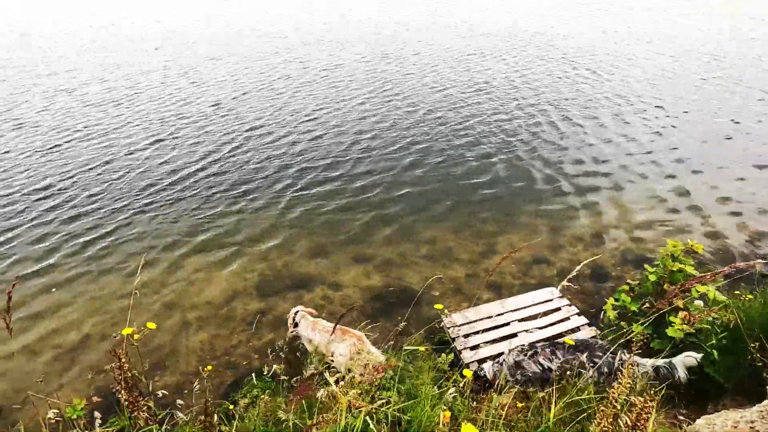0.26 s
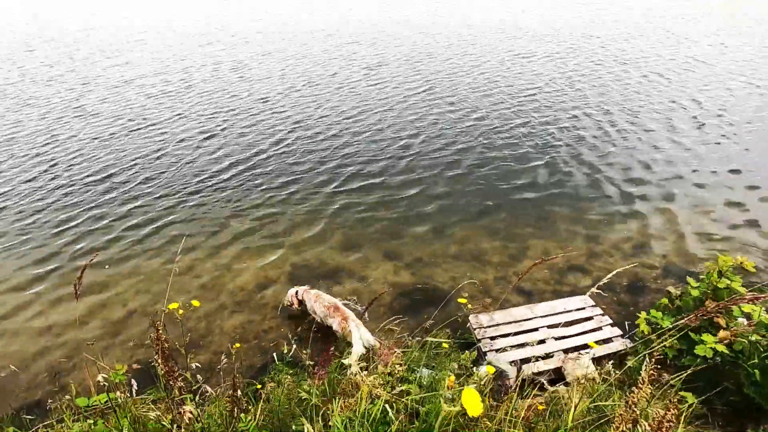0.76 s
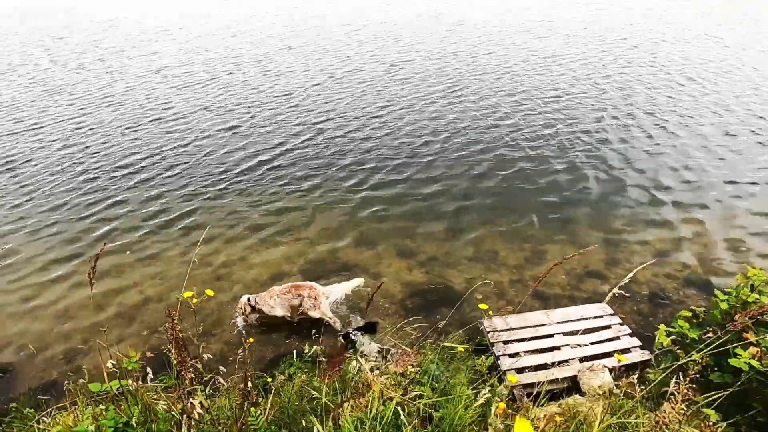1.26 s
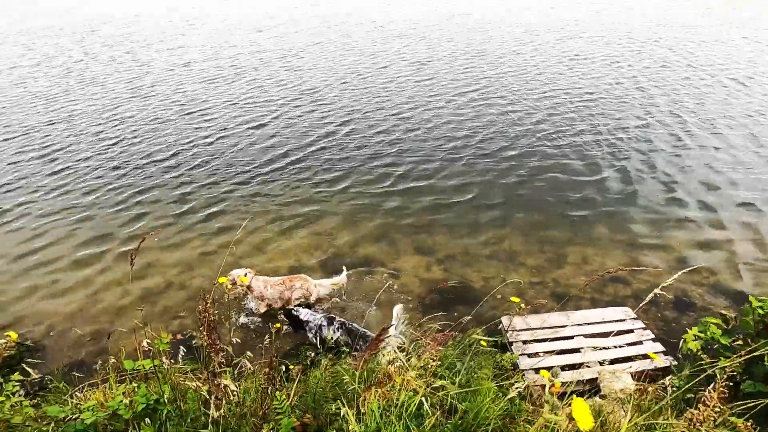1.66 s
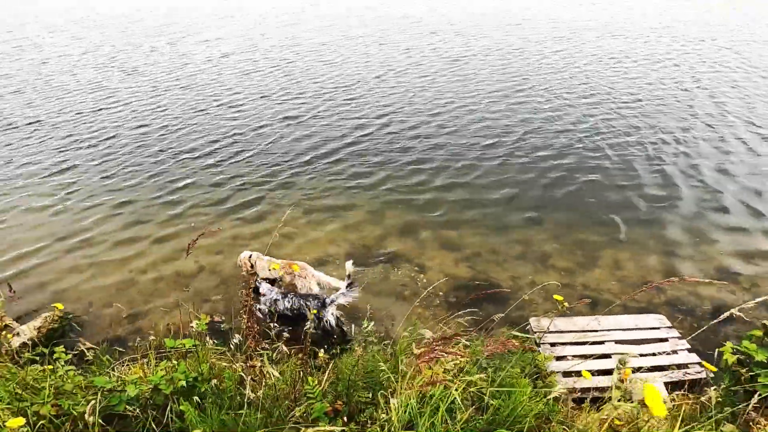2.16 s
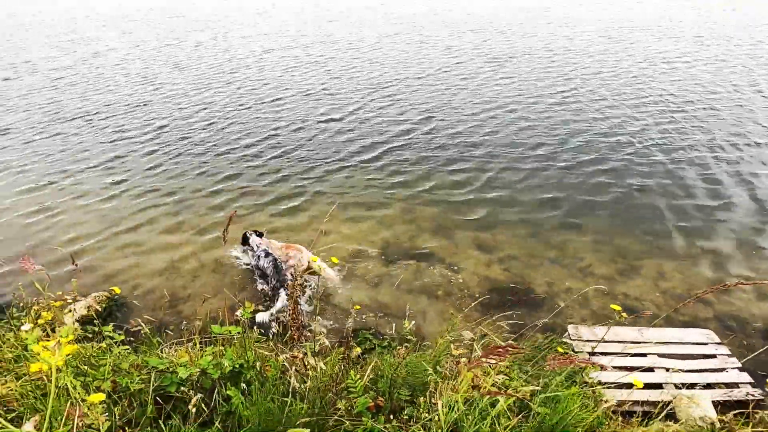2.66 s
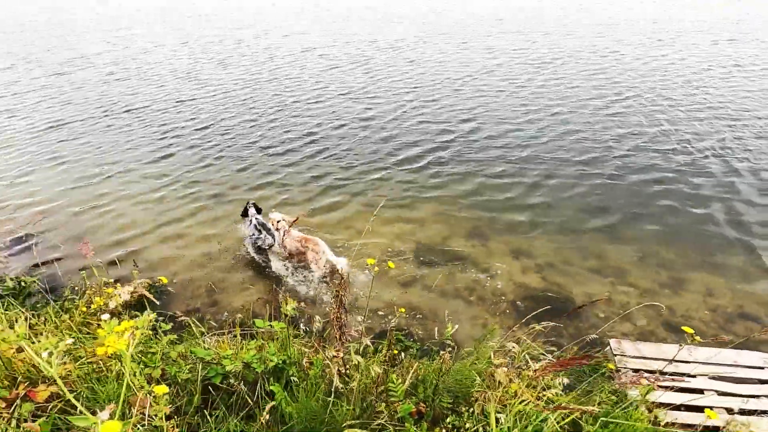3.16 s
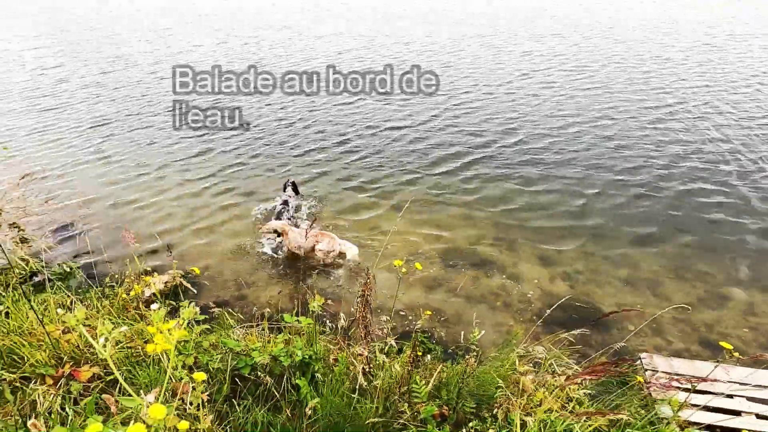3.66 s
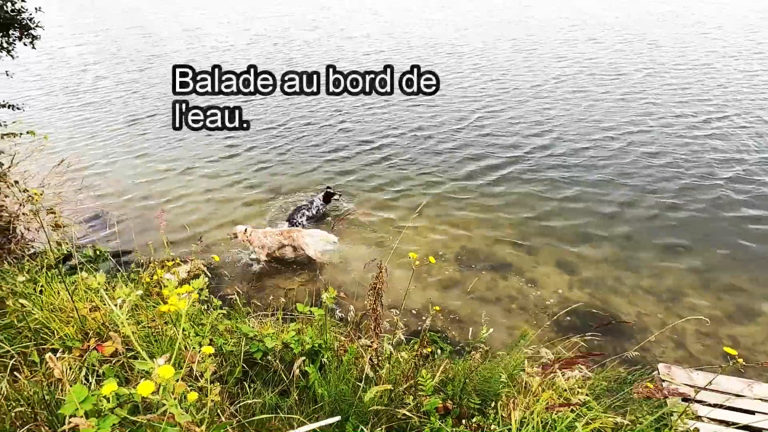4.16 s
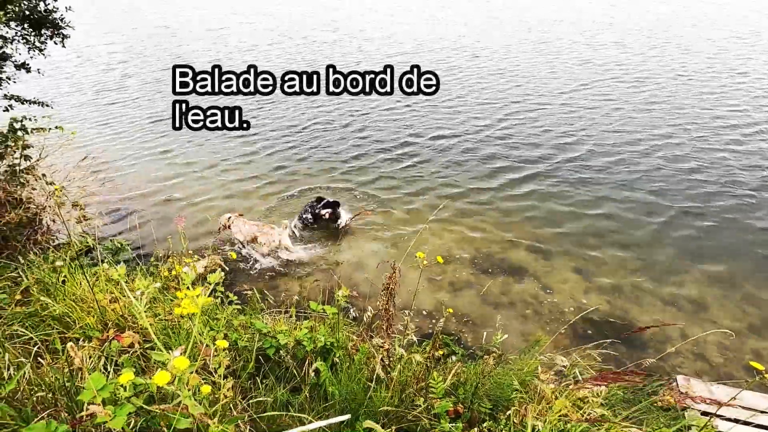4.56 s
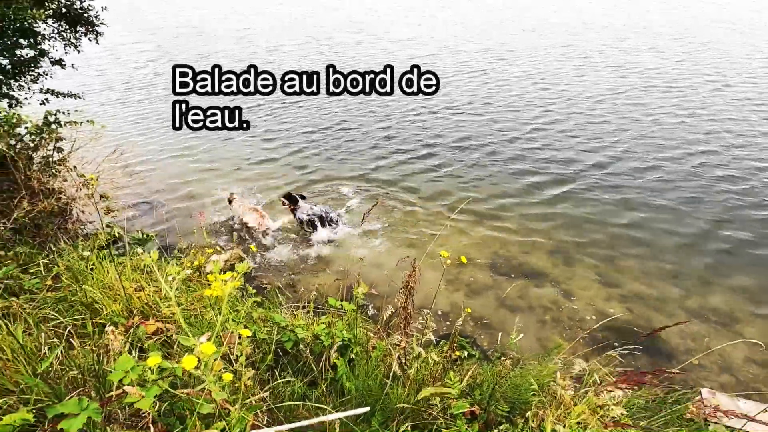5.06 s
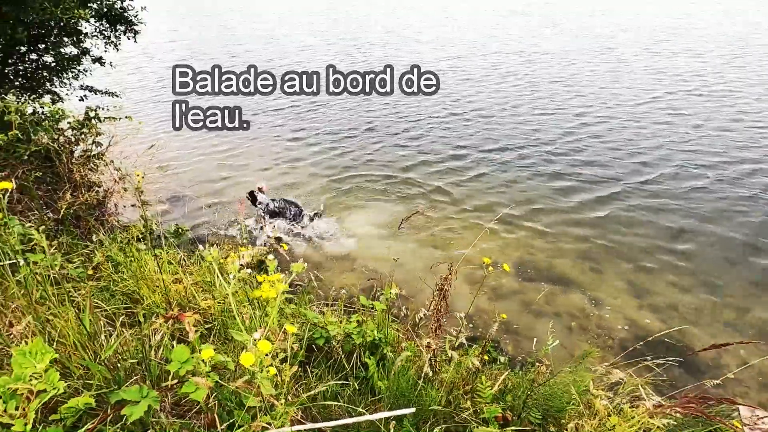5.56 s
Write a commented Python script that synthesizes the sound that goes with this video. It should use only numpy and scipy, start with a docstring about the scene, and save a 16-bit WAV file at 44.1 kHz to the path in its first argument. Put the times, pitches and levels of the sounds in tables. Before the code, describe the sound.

Two dogs wade through shallow lake water a few metres away. Their legs churn and slosh, paws slap the surface unevenly, and round plops and small drips fall in between. The splashing starts light and grows busier after about two seconds. Gusty wind rumbles on the microphone throughout, with an occasional dull thump. The water sounds boxy, as if heard through a closed case.

```python
"""Lake shallows, a few metres from a small camera in a closed case: two dogs wade and splash.
Legs churn up drops and bubbles, paws slap the surface, air pockets plop and single drops tick back.
The water reaches the two microphones through the ringing case; wind rumbles on it in gusts, with a
dull thump now and then. The sound starts in dull mono and opens into stereo after a second."""
import sys
import numpy as np
from scipy import signal
from scipy.fft import rfft, irfft, next_fast_len
from scipy.io import wavfile
from scipy.ndimage import uniform_filter1d

SR = 44100
rng = np.random.default_rng(int(sys.argv[2]) if len(sys.argv) > 2 else 0)


def master_out(mix):
    """Clip the mix to full scale and print it as 16-bit PCM to the path in sys.argv[1]."""
    frames = np.transpose(np.atleast_2d(mix))
    ceiling = np.clip(frames, -1, 1)
    pcm = np.round(ceiling * 32767).astype(np.int16)
    wavfile.write(sys.argv[1], SR, pcm)


N = 256573


def amp(db):
    """Gain of a level in dB."""
    return 10 ** (np.asarray(db) / 20)


def unit_rms(x):
    """Scaled to unit rms."""
    return x / np.sqrt(np.mean(x ** 2) + 1e-20)


def automation(rows):
    """Each level column of a timed table as a fader ride, one value per sample."""
    times, *columns = np.transpose(rows)
    return [np.interp(np.arange(N) / SR, times, column) for column in columns]


def drift(rate_hz):
    """Slow random wobble with a spread of 1."""
    pole = np.exp(-80 * np.pi * rate_hz / SR)   # runs at one step per 40 samples
    slow = signal.lfilter([1], [1, -2 * pole, pole * pole], rng.standard_normal(N // 40 + 2002))[2000:]
    return np.interp(np.arange(N) / 40, np.arange(len(slow)), unit_rms(slow))


def bursts(times, levels_db, t60s, rise):
    """Envelope of sudden hits that die away; the attack is the share `rise` of each decay time."""
    out, t = np.zeros(N), np.arange(SR // 2) / SR
    for s, level_db, t60 in zip(times, levels_db, t60s):
        start = round(s * SR)
        hit = amp(level_db - 60 * t / t60) * (1 - np.exp(-t / (rise * t60)))
        out[start:start + len(t)] += hit[:N - start]
    return out


def chirps(rows, rise_s, glide):
    """Dying tones whose pitch bends up by the share 2 * glide over their decay time."""
    out, t = np.zeros(N), np.arange(SR // 3) / SR
    for s, level_db, hz, t60 in rows:
        start = round(s * SR)
        turns = hz * t * (1 + glide * t / t60)
        tone = amp(level_db - 60 * t / t60) * (1 - np.exp(-t / rise_s)) * np.sin(2 * np.pi * turns)
        out[start:start + len(t)] += tone[:N - start]
    return out


def droplets(per_s, spread_db, clump_db, wash):
    """Drops of uneven size land in clumps over a smooth wash; two unrelated rows."""
    sizes = amp(spread_db * np.minimum(rng.exponential(1, N), 5)) * (rng.random(N) < per_s / SR)
    patter = unit_rms(sizes) + wash * np.abs(rng.standard_normal(N))
    clumps = amp(clump_db * (drift(17) + drift(18)))
    return unit_rms(patter * clumps * rng.choice([-1, 1], (2, N)))


def bubbles(per_s, spread_db, cycles, pitches=28):
    """Small bubbles, each ringing some cycles at a pitch of its own; two unrelated rows."""
    sizes = amp(spread_db * np.minimum(rng.exponential(1, (2, N)), 5))
    sizes *= rng.random((2, N)) < per_s / SR
    pitch_index, out = rng.integers(0, pitches, (2, N)), 0
    for k, hz in enumerate(np.geomspace(900, 9000, pitches)):
        decay, step = amp(-60 * hz / (cycles * SR)), 2 * np.pi * hz / SR
        kicks = sizes * (pitch_index == k) + 1e-18
        out += hz * signal.lfilter([0, np.sin(step)], [1, -2 * decay * np.cos(step), decay ** 2], kicks)
    return unit_rms(out)


# The wading bed: (time [s], spray level [dB], slosh level [dB])
WADING = [(0.0, -72, -60), (0.06, -68.5, -65.5), (0.27, -61, -60.5), (0.48, -69, -62.5), (0.84, -66, -62.5),
          (0.95, -68.5, -62), (1.25, -65.5, -61.5), (1.49, -57, -55.5), (1.72, -59, -55), (2.0, -59, -61),
          (2.25, -62, -60), (2.33, -63, -58.5), (2.49, -66, -60.5), (2.53, -58, -53), (2.72, -54.5, -54.5),
          (2.95, -57, -54), (3.45, -59, -55), (3.6, -65, -57), (3.75, -57.5, -55.5), (3.99, -65, -57),
          (4.12, -62.5, -56), (4.65, -57.5, -55), (4.88, -54.5, -52), (5.39, -58, -53),
          (5.82, -54.5, -53.5)]


def churn():
    """Legs and bodies stir up drops and bubbles: spray, slosh, and the spray's fader ride in dB."""
    spray_db, slosh_db = automation(WADING)
    drops = droplets(3000, spread_db=-0.5, clump_db=2.0, wash=0.47)
    stirred = unit_rms(drops + 0.64 * bubbles(2000, spread_db=3.0, cycles=31.6))
    return stirred * amp(spray_db), stirred * amp(slosh_db), spray_db


def mist(spray, slap_spray, spray_db):
    """Fine fizz on top of the spray; slaps are duller than the spatter around them."""
    spatter = droplets(830, spread_db=4.0, clump_db=3.5, wash=0.21) * amp(spray_db)
    return (0.76 * spray + 0.5 * spatter + 0.69 * slap_spray) * amp(-17)


def gurgle(spray_db, plop_tails):
    """Sparse glugs that swell with the spray and after each plop."""
    bed_db, mean_spray_db, follow = -78.5, -61, 0.72
    bed = amp(bed_db + follow * (spray_db - mean_spray_db))
    return droplets(300, spread_db=-2.5, clump_db=1.0, wash=0.4) * (bed + plop_tails)


def resonate(force, modes, apart):
    """Neighbouring modes ring to unrelated forces; the right port takes a share `apart` from the other."""
    size = next_fast_len(N + 8192)
    hz = np.arange(size // 2 + 1) * SR / size
    shake, out, power = rfft(force, size), 0, 0
    for row in range(2):
        ports = 0
        for mode_hz, width_hz, left_db, right_db, lead in modes[row::2]:
            damping = 1j * hz * width_hz
            ringing = (damping / (mode_hz ** 2 - hz ** 2 + damping)) ** 2   # squared for steep flanks
            ports += ringing * np.array([[amp(left_db)], [amp(right_db) * np.exp(1j * lead)]])
        right = np.sqrt(1 - apart) * shake[row] + np.sqrt(apart) * shake[1 - row]
        out += ports * [shake[row], right]
        power += np.mean(np.abs(ports.mean(axis=0)) ** 2)
    return irfft(out, size)[:, :N] / np.sqrt(power)


# The boxy colour of the case, in four banks from low to high; levels are relative within a bank:
# (pitch [Hz], width [Hz], left level [dB], right level [dB], phase lead of the right port [rad])
GURGLE_MODES = [(460, 426, 3, 0, .1), (754, 240, -2.5, 0, 2)]
SLOSH_MODES = [(973, 260, -31, -23.5, 1.8), (1074, 190, -16.5, -16.5, 1.07), (1349.4, 114, 2.5, -1.5, 0.13),
               (1483, 130, -11.5, -7, .7), (1676, 180, -16.5, -13, 0.71), (1911, 130, -18.5, -15, 0.53)]
SPRAY_MODES = [(2216, 222, -22.5, -13, 3), (2601, 147, -15.5, -12, 0.96), (2814, 280, -14, -8, 1.37),
               (3032, 210, -18, -17, 4), (3248, 130, -13.5, -12.5, -2.5), (3480, 230, -14, -13, 0.53),
               (3730, 430, -16.5, -15, 0.83), (4032, 204, -21, -16.5, 0), (4396, 110, -27.5, -19.5, -2.55)]
MIST_MODES = [(4720, 290, -1, -4.5, 0.84), (5130, 140, -3, 0, -5.65), (5270, 170, 1.5, -8, -6.7),
              (5643, 220, -1.5, 3.5, -2.7), (6185, 250, -0.5, -5, -1.2), (6810, 530, -9, -5.5, 2.1),
              (7700, 680, -16, -17, -2.5), (8730, 450, -11.5, -26, 1.9), (11400, 4800, -30, -34.5, -24)]


def ringing_case(glugs, slosh, spray, fizz):
    """Each water layer shakes its own bank of case resonances on the way to the microphone ports."""
    return (resonate(glugs, GURGLE_MODES, apart=0.1) + resonate(slosh, SLOSH_MODES, apart=0.015)
            + resonate(spray, SPRAY_MODES, apart=0.035) + resonate(fizz, MIST_MODES, apart=0.13))


def turbulence(spectrum, even_s):
    """Low noise of a given colour whose own swell is evened out over even_s."""
    hz = np.maximum(np.arange(N // 2 + 1) * SR / N, 1)
    eq_hz, eq_db = np.transpose(spectrum)
    colour = amp(np.interp(np.log(hz), np.log(eq_hz), eq_db, left=-80, right=-120))
    air = unit_rms(irfft(rfft(rng.standard_normal(N)) * colour, N))
    local_power = uniform_filter1d(air ** 2, size=round(even_s * SR))
    return unit_rms(air / np.sqrt(local_power + 0.034))


# The wind bed, pre-fader: (time [s], rumble level [dB], flutter level [dB])
WIND_BED = [(0.0, -44, -52), (0.57, -46, -52), (1.12, -46, -55.5), (1.65, -46, -55.5), (2.04, -43.5, -51),
            (2.83, -50.5, -56), (3.08, -48.5, -50), (5.27, -42.5, -55.5), (5.54, -50.5, -58),
            (5.82, -41.5, -59)]
# Brief dips in the bed, and one lift: (time [s], level change [dB])
WIND_LULLS = [(.03, -1.5), (.26, -11), (1.8, -9), (2.48, -11), (2.83, -2.5), (3.651, 3.5), (3.98, -3),
              (4.27, -9), (4.52, -4), (5.45, -8)]
# EQ curves of the four wind layers: (frequency [Hz], relative level [dB])
RUMBLE_EQ = [(12, -16), (20, 0.5), (36, -4), (55, -16.5), (80, -35)]
FLUTTER_EQ = [(40, -18), (58, 2), (75, -1), (100, -14), (140, -29.5), (200, -49.5)]
RUSTLE_EQ = [(100, -16), (140, -1), (220, -0.5), (280, -11), (420, -34.5)]
SIDE_AIR_EQ = [(15, 5), (40, -2), (90, -9), (200, -18.5), (350, -23.5), (600, -48.5)]


def wind():
    """Air buffets the case: rumble, flutter and rustle at both ports, a little side air for width."""
    t = np.arange(N) / SR
    buffet_db, buffet_hz, lull_half_width_s = 4, 7.0, 0.034
    buffets = amp(buffet_db * np.array([drift(buffet_hz), drift(buffet_hz)]))
    lulls_db = sum(db * np.exp(-((t - s) / lull_half_width_s) ** 2) for s, db in WIND_LULLS)
    rumble, flutter = amp(automation(WIND_BED) + lulls_db) * buffets + gusts()
    rustle = amp(-48.5) * flutter ** 0.51   # the upper edge swings less than the flutter
    body = rumble * turbulence(RUMBLE_EQ, 0.07) + flutter * turbulence(FLUTTER_EQ, 0.064)
    body += rustle * turbulence(RUSTLE_EQ, 0.27)
    side_air = rumble * amp(-29) * turbulence(SIDE_AIR_EQ, 1.0)
    return body + side_air * [[1], [-1]]


# Round plops, pre-fader: (time [s], level [dB], pitch [Hz])
AIR_POCKETS = [(0.078, -52, 500), (0.25, -62, 646), (0.372, -49.5, 453), (1.2545, -43.5, 770),
               (1.321, -64, 428), (2.358, -55, 465), (2.648, -52.5, 440), (2.702, -49, 630),
               (2.834, -54, 620), (2.98, -58, 506), (3.369, -53, 400), (3.443, -49.5, 341),
               (3.47, -51, 735), (3.5, -53, 468), (4.734, -52, 860), (4.892, -48, 434), (4.988, -49, 473),
               (5.141, -53.5, 496), (5.202, -56, 500), (5.583, -56, 424), (5.751, -54.5, 307),
               (5.771, -56, 453)]


def plops(cycles=24.5, tail_db=-15, tail_t60_s=0.18):
    """Air pockets close behind a paw and ring upward: the tones, and the envelope of their gurgle."""
    tones = chirps([(s, db, hz, cycles / hz) for s, db, hz in AIR_POCKETS], rise_s=0.0024, glide=0.18)
    times, levels_db, _ = np.transpose(AIR_POCKETS)
    tails = bursts(times, levels_db + tail_db, [tail_t60_s] * len(times), rise=0.011)
    return tones, tails


# Splash hits, pre-fader: (time [s], spray level [dB], slosh level [dB], spray's 60 dB decay [s])
SPLASH_HITS = [(0.0838, -40.5, -38.5, 0.17), (0.164, -40, -34.5, 0.047), (0.223, -42.5, -43, 0.11),
               (0.371, -41, -43, 0.27), (0.4194, -42, -42.5, 0.035), (0.6201, -39, -40.5, 0.046),
               (0.687, -56, -36.5, 0.07), (0.7711, -40, -41, 0.13), (0.836, -35.5, -42, 0.015),
               (0.886, -54, -49, 0.032), (1.105, -60, -46.5, 0.042), (1.151, -43, -46, 0.071),
               (1.275, -49, -49, 0.035), (1.2541, -55, -29.5, 0.034), (1.309, -38, -52, 0.037),
               (1.339, -37.5, -49, 0.074), (1.386, -48, -35, 0.081), (1.4213, -36, -29, 0.044),
               (1.481, -45, -66, 0.073), (1.6214, -35.5, -39, 0.022), (1.6615, -36, -54, 0.11),
               (1.696, -35.5, -57, 0.16), (1.8254, -37, -58, 0.037), (2.062, -49, -36.5, 0.3),
               (2.2094, -38, -73, 0.028), (2.2639, -33.5, -34, 0.08), (2.35, -35.5, -41.5, 0.082),
               (2.5058, -37, -33, 0.035), (2.53, -49, -35.5, 0.19), (2.618, -34, -49, 0.038),
               (2.6848, -40, -35.5, 0.45), (2.729, -41, -37.5, 0.23), (2.835, -34, -36, 0.082),
               (2.9739, -31.5, -39, 0.024), (3.0069, -29.5, -34.5, 0.04), (3.152, -36.5, -34.5, 0.12),
               (3.191, -45, -34.5, 0.11), (3.25, -41, -65, 0.036), (3.329, -40.5, -62, 0.16),
               (3.469, -40, -32, 0.29), (3.655, -65, -40, .05), (4.08, -41.5, -63, 0.26),
               (4.2273, -34.5, -42, 0.1), (4.7359, -34, -26.5, 0.16), (4.862, -40, -43, 0.33),
               (4.8994, -33.5, -30.5, 0.14), (4.9235, -42, -29, 0.11), (5.1595, -38, -40, 0.12),
               (5.3524, -65, -29, 0.013), (5.422, -37, -44, 0.29), (5.524, -36.5, -52, 0.056),
               (5.554, -61, -30, 0.032), (5.6055, -27.5, -31, 0.093), (5.691, -56, -42, 0.044),
               (5.7693, -32.5, -27.5, 0.068)]


def slaps(crest=2.12, smack_db=11.5):
    """Paws and bodies smack the surface and throw a dense sheet of water: spray and slosh."""
    times, spray_db, slosh_db, t60s = np.transpose(SPLASH_HITS)
    sheet = rng.choice([-1, 1], (2, N)) / crest
    spray = sheet * bursts(times, spray_db, t60s, rise=0.062)
    slosh = 0.68 * sheet * bursts(times, slosh_db, 0.96 * t60s, rise=0.045)
    slosh[:, np.round(times * SR).astype(int)] += amp(slosh_db + smack_db)   # the first contact
    return spray, slosh


# Wind swells, pre-fader: (peak time [s], rumble level [dB], flutter level [dB], half width [s])
WIND_GUSTS = [(0.181, -45.5, -81, 0.055), (0.311, -49, -72, 0.043), (0.478, -40, -41, 0.039),
              (0.569, -44, -46, 0.045), (.65, -29, -43.5, 0.023), (.76, -45, -59, 0.012),
              (0.832, -49, -38.5, 0.0092), (1.25, -47, -58, 0.015), (1.65, -39, -68, 0.028),
              (1.852, -36, -59, 0.011), (1.979, -34, -28, 0.018), (2.05, -41, -42, 0.032),
              (2.16, -49, -56, 0.022), (2.32, -47.5, -64, .02), (2.43, -46.5, -64, 0.036),
              (2.548, -39, -46.5, 0.029), (2.742, -45.5, -53, 0.047), (3.162, -35, -59, 0.033),
              (3.709, -37, -38.5, 0.02), (3.85, -42, -71, 0.027), (3.94, -43, -61, 0.013),
              (4.041, -41.5, -49, 0.011), (4.119, -42, -41, 0.033), (4.348, -36.5, -46.5, 0.042),
              (4.46, -45, -67, 0.018), (4.598, -40, -65, 0.017), (4.739, -41, -50.5, 0.032),
              (4.901, -45, -58.5, 0.049), (5.188, -41.5, -55, 0.084), (5.55, -38, -50.5, 0.015),
              (5.75, -46, -56, 0.037)]


def gusts():
    """Gusts push on the case: bell-shaped swells for the rumble and flutter envelopes."""
    t = np.arange(N) / SR
    return sum(amp([[rumble_db], [flutter_db]]) * np.exp(-((t - s) / half_s) ** 2)
               for s, rumble_db, flutter_db, half_s in WIND_GUSTS)


# Sparkle from single drops: (time [s], level [dB], pitch [Hz])
FALLING_DROPS = [(0.4244, -54, 4370), (0.8379, -52, 4330), (1.1568, -66, 4500), (2.2493, -47, 6200),
                 (2.6105, -54, 4460), (2.6414, -56, 4330), (2.6837, -53, 4410), (3.0619, -58, 4360),
                 (3.251, -41, 4400), (3.3417, -58, 4360), (3.446, -51, 4420), (4.7625, -50, 4460)]


def drop_ticks(cycles=36):
    """Single drops fall back into the lake, each with a bright tick."""
    return chirps([(s, db, hz, cycles / hz) for s, db, hz in FALLING_DROPS], rise_s=0.00038, glide=0.05)


# Low accents, pre-fader: (time [s], level [dB], pitch [Hz])
CASE_THUMPS = [(0.46, -48, 168), (0.646, -46, 157), (0.821, -53, 219), (1.166, -46, 215),
               (1.26, -51.5, 229), (1.406, -51, 170), (1.944, -36.5, 209), (2.092, -51, 205),
               (2.695, -54.5, 208), (3.373, -44.5, 242), (3.453, -37, 216), (3.489, -43, 230),
               (4.424, -42.5, 228.5), (5.599, -56.5, 238), (5.697, -56, 223)]


def thumps(t60_s=0.11):
    """Dull thumps come through the case: short low tones with a soft attack."""
    return chirps([(s, db, hz, t60_s) for s, db, hz in CASE_THUMPS], rise_s=0.0077, glide=0.01)


def scene():
    """The mix at the two ports; plops, wind and thumps are slightly louder on the left."""
    spray, slosh, spray_db = churn()
    plop_tones, plop_tails = plops()
    slap_spray, slap_slosh = slaps()
    fizz = mist(spray, slap_spray, spray_db)
    glugs = gurgle(spray_db, plop_tails)
    water = ringing_case(glugs, slosh + slap_slosh, spray + slap_spray, fizz)
    water += drop_ticks() + plop_tones * amp([[0.6], [-0.7]])
    return water + (wind() + thumps()) * amp([[0.25], [-0.25]])


def record(dry):
    """A dulled left port feeds both channels until the stereo opens; faint hiss, the top is cut."""
    mono_cut_hz, top_cut_hz, hiss_db = 7000, 15200, -100
    mono = signal.sosfilt(signal.butter(4, mono_cut_hz, fs=SR, output="sos"), dry[0])
    width = np.interp(np.arange(N) / SR, [1.1, 3.3], [0, 1])   # opens between these times [s]
    out = mono + width * (dry - mono) + amp(hiss_db) * rng.standard_normal((2, N))
    return signal.sosfilt(signal.cheby2(12, 70, top_cut_hz, fs=SR, output="sos"), out)


dry = scene()
out = record(dry)
master_out(out)
```